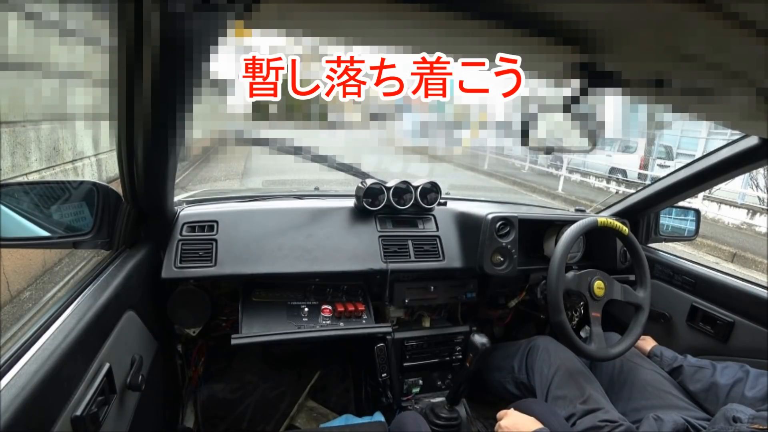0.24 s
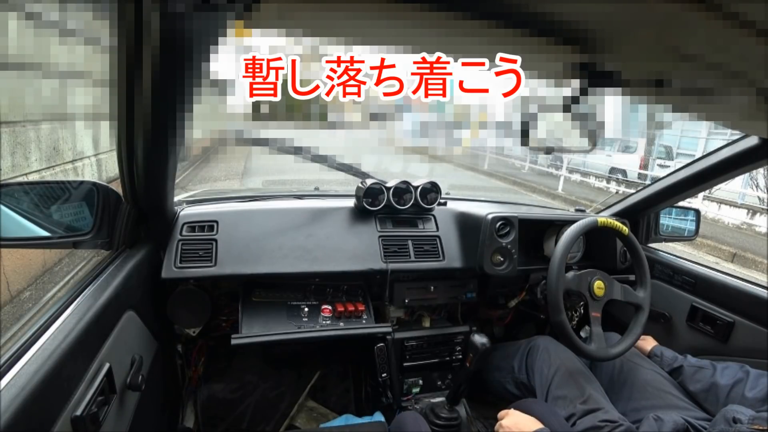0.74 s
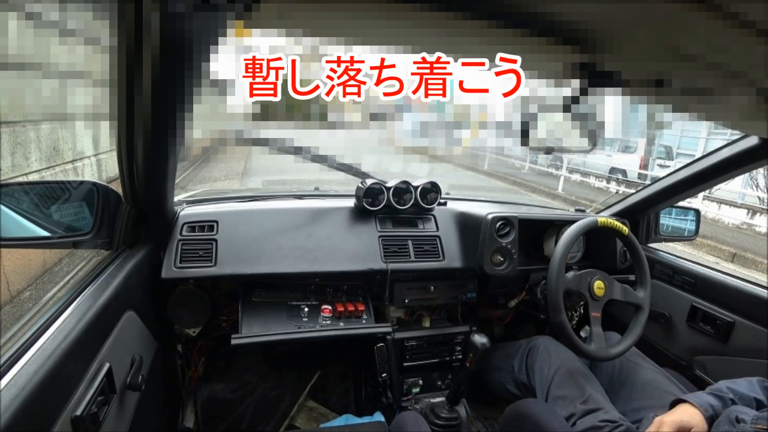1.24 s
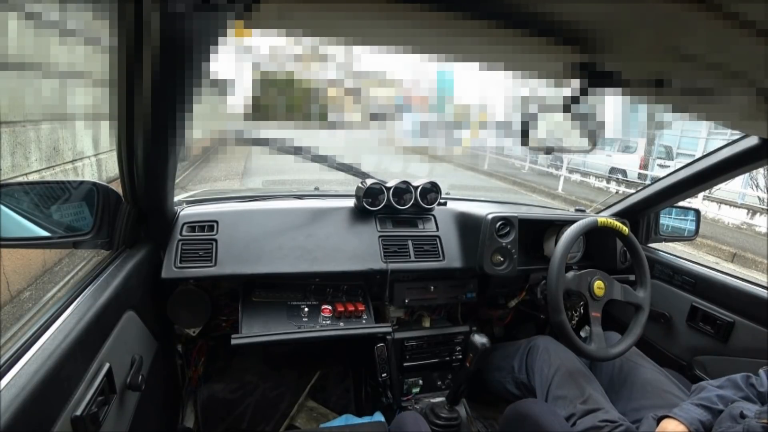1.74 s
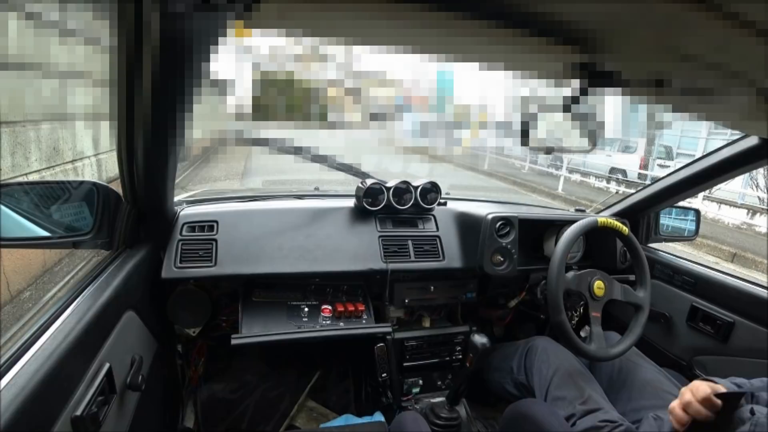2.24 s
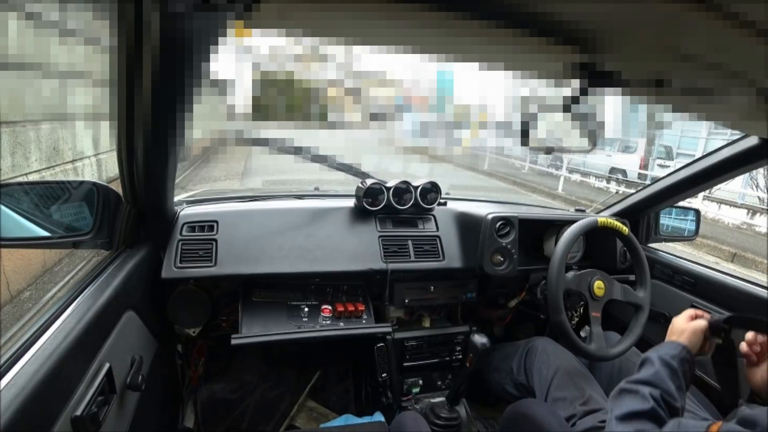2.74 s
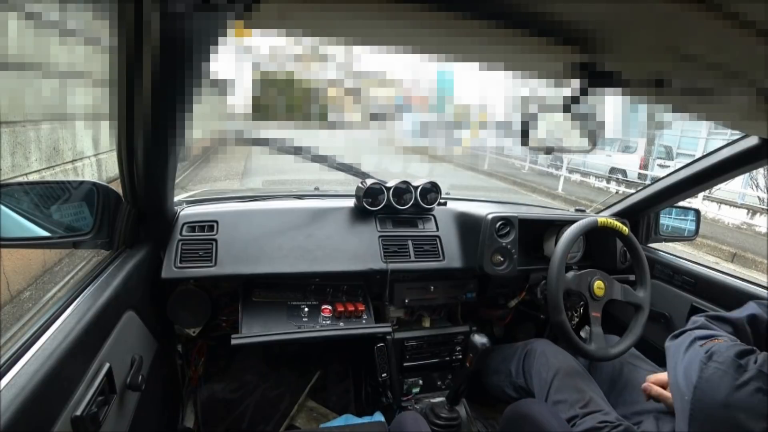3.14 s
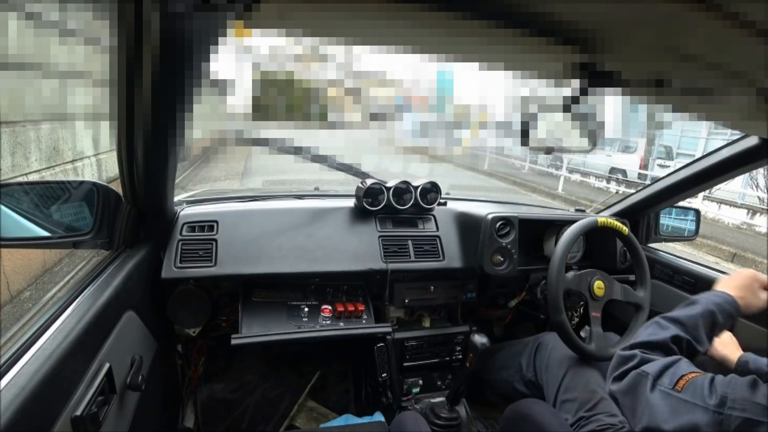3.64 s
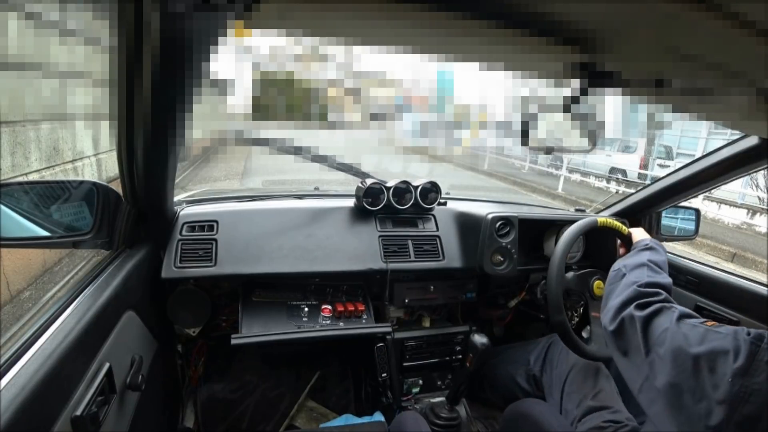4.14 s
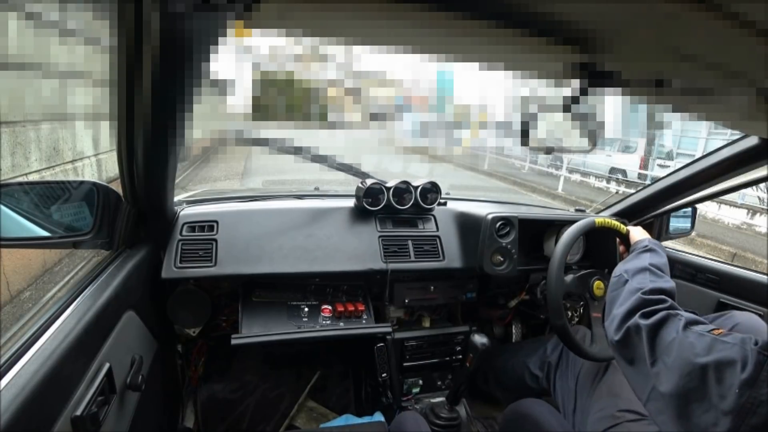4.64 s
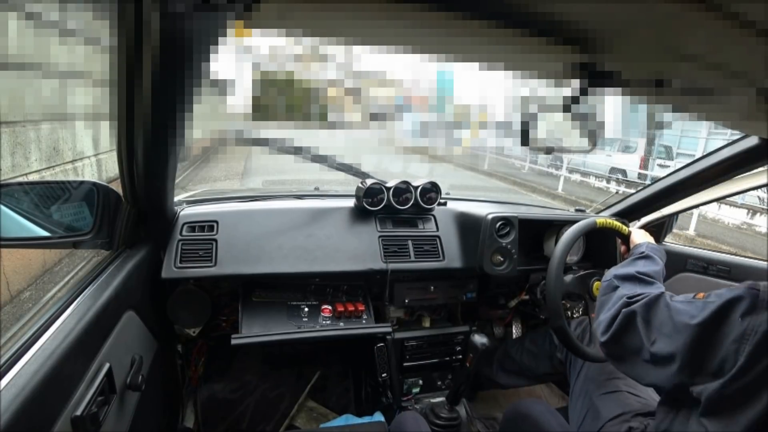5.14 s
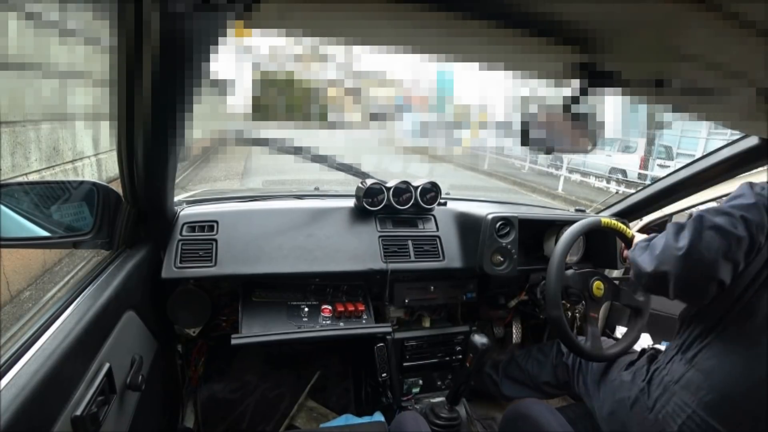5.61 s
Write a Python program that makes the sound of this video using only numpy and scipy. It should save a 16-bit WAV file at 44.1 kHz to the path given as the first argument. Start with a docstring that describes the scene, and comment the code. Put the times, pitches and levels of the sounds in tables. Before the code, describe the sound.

Close cabin sounds of jacket rustle, belt rubbing, buckle snap, seat knocks and door latch clunks, with deep traffic rumble swelling underneath.

```python
"""A driver unbuckles, shifts in the seat and opens the door of a parked car, close to two microphones.
Jacket, webbing and seat are noise roughened by sparse slips; seat and door knocks are rough contacts
ringing damped panel modes; buckle and trim clicks are a ringing pitch over crackle.
Low-passed traffic rumble swells as the body lurches; hiss lies beneath; the level dips briefly at times
as the door unlatches; late on a small metal part sings a thin wavering tone."""
import sys
import numpy as np
from scipy import signal
from scipy.fft import rfft, irfft
from scipy.io import wavfile
from scipy.ndimage import uniform_filter1d

SR = 44100
rng = np.random.default_rng(int(sys.argv[2]) if len(sys.argv) > 2 else 0)


def wav_out(sig):
    """Save sig, one row per channel (or a flat mono array), as 16-bit PCM at SR to the path in sys.argv[1]."""
    wavfile.write(sys.argv[1], SR, np.round(np.clip(np.atleast_2d(sig).T, -1, 1) * 32767).astype(np.int16))


def level_to_linear(level):
    """Convert decibel levels to linear amplitude factors, elementwise."""
    exponent = np.asarray(level, float) / 20
    return 10 ** exponent


N = 258867


def read(points, hz):
    """Spectrum table at hz, straight on a log-frequency axis."""
    f, value = np.transpose(points)
    return np.interp(np.log(hz + 1), np.log(f + 1), value)


def curve(rows):
    """Every column of a time table, interpolated at each sample."""
    s, *columns = np.transpose(rows)
    return [np.interp(np.arange(N) / SR, s, c) for c in columns]


def swells(rows):
    """Power of each swell at each sample: straight rise and fall in dB around its peak."""
    s, db, rise_s, fall_s = np.transpose(rows)[:4, :, None]
    at = np.arange(0, N, 32)
    t = at / SR - s
    # rise and fall times below 1 ms, negative ones too, count as 1 ms
    drop_db = 10 * np.maximum(-t / np.maximum(rise_s, .001), t / np.maximum(fall_s, .001))
    power = level_to_linear(2 * (db - drop_db))
    return np.array([np.interp(np.arange(N), at, p) for p in power])


def evened(x):
    """Scales to rms 1."""
    return x / np.sqrt(np.mean(x ** 2) + 1e-20)


def add(mix, s, sound):
    """Mixes a stereo sound in at s seconds."""
    part = mix[:, round(s * SR):][:, :sound.shape[1]]
    part += sound[:, :part.shape[1]]


def hump(hz, centre_hz, octaves):
    """Broad emphasis around one pitch."""
    return 1 / (1 + (np.log2((hz + 1) / centre_hz) / octaves) ** 2) ** 2


def grainy(per_s, spread_db, tail_s, smooth):
    """Noise pair whose loudness is kicked up by sparse slips that die away."""
    kicks = level_to_linear(spread_db * np.minimum(rng.exponential(1, N), 4))
    slips = kicks * (rng.random(N) < per_s / SR)
    decay = np.exp(-1 / (tail_s * SR))
    lumps = smooth + evened(signal.lfilter([1], [1, -decay], slips))
    return lumps * rng.standard_normal((2, N))


def recoloured(x, size, patchy_db, gain):
    """Multiplies short-time spectra by gain(hz, s) at even power and by drifting random patches; rms 1."""
    hz, s, z = signal.stft(x, SR, nperseg=size)
    patches = uniform_filter1d(rng.standard_normal(z.shape[1:]), 8, 0)
    patches = evened(uniform_filter1d(patches, 8, 1))
    g = gain(hz[:, None], s)
    power = (abs(z) ** 2).mean((0, 2))[:, None]
    g = g / np.sqrt((g ** 2 * power).sum(0) / power.sum())
    return evened(signal.istft(z * g * level_to_linear(patchy_db * patches), SR, nperseg=size)[1][:, :N])


# left-right likeness of distant sound: (frequency [Hz], likeness [-1 to 1])
LIKENESS = [(30, 1), (60, 0.96), (170, 0.99), (480, 0.84), (1360, 0.61), (3870, -0.058), (11000, -0.46)]
LEFT_LAG_S = 7e-5


def pair(a, b, gain, near=0.):
    """Two microphones: alike in the bass, less so in the treble unless near; gain(hz) colours both."""
    hz = np.fft.rfftfreq(len(a), 1 / SR)
    same = np.clip(read(LIKENESS, hz) * (1 - near) + near, -1, 1)
    right = rfft(a)
    left = same * right + np.sqrt(1 - same ** 2) * rfft(b)
    left = left * np.exp(-2j * np.pi * hz * LEFT_LAG_S)
    return irfft(np.array([left, right]) * gain(hz), len(a))


# traffic boom: (time [s], level [dB])
RUMBLE_LEVEL = [(0.0, -51), (0.15, -34), (0.8, -32), (1.27, -35), (2.0, -34), (2.52, -38.5), (2.9, -29),
                (3.4, -40.5), (3.66, -41), (3.9, -35), (4.12, -33), (4.5, -22.5), (4.71, -30.5),
                (5.0, -25.5), (5.25, -25.5), (5.55, -21), (5.87, -21.5)]
# relative rumble spectrum: (frequency [Hz], gain [dB])
RUMBLE_COLOUR = [(8.8, -47), (15, 3), (32, -3.5), (62, -5), (145, -18.5), (253, -25.5), (294, -27),
                 (571, -35), (770, -37), (839, -38), (2500, -49), (3250, -78), (5500, -120)]
# body lurching on its springs as weight shifts:
# (peak time [s], level [dB], time to rise 10 dB [s], time to fall 10 dB [s])
LURCHES = [(.46, -30, -0.04, 0.6), (.88, -27, -0.03, 0.2), (1.4, -23.5, 0.02, 0), (1.54, -21, 0.1, 0.03),
           (2.45, -29.5, 1.5, .06), (2.7, -29, .15, 0), (3.12, -24.5, .3, 0), (3.53, -24.5, 0.3, .06),
           (3.74, -18, 0, 0.05), (4.07, -18.5, 0.22, -0.07), (4.22, -18.5, 0.13, 0.1),
           (4.35, -18, -0.08, .12), (4.64, -20.5, 0.1, .06), (4.77, -28, -0.2, -0.5),
           (4.9, -19, -0.05, 0.1), (5.15, -22.5, 0.23, 0.3), (5.43, -27, -0.18, 0)]


def rumble():
    """Traffic through the body: low-passed noise swelling with each lurch, over a steady upper part."""
    noise = pair(*rng.standard_normal((2, N)), lambda hz: level_to_linear(read(RUMBLE_COLOUR, hz)))
    boom = signal.sosfilt(signal.butter(2, 130, fs=SR, output="sos"), noise)
    level_db, = curve(RUMBLE_LEVEL)
    boom_power = level_to_linear(2 * level_db) + swells(LURCHES).sum(0)
    upper = level_to_linear(-32) * (noise - boom) / np.std(boom)
    return evened(boom) * np.sqrt(boom_power) + upper


def hiss():
    """Microphone hiss: white noise, independent per channel."""
    return level_to_linear(-52.5) * rng.standard_normal((2, N))


# relative cloth spectrum: (frequency [Hz], gain [dB])
CLOTH_COLOUR = [(1180, -46), (2000, -5.5), (2780, -2.5), (4450, -3.5), (4770, -5.5), (6970, -4.5),
                (9950, -6), (11000, -8.5), (14300, -46), (22000, -120)]
# jacket strokes: (peak time [s], level [dB], time to rise 10 dB [s], time to fall 10 dB [s],
# brightness [dB per octave])
STROKES = [(.97, -38, -0.6, -0.5, 7), (1.075, -32.5, 0.16, .055, 3.5), (1.2, -34, -1.07, -0.6, -8),
           (1.264, -39.5, -0.64, 0.43, 4), (1.37, -38, 0.05, -0.2, 1), (1.518, -29, 0, 0.03, 6),
           (1.63, -46.5, 0.2, .12, 8.5), (1.958, -33.5, 0, 0.08, 0), (2.196, -34, 0.08, .13, 3),
           (2.47, -44, -0.26, 0.2, 7), (2.743, -29.5, 0.01, 0.06, 1.5), (2.96, -44, -0.3, 0.27, -2),
           (3.09, -43.5, -1.56, -0.3, 3.5), (3.17, -38, 0.07, 0.14, -3), (3.974, -36.5, 0.04, 0.04, -4),
           (4.394, -34.5, 0.03, -0.17, 0.5), (4.522, -43, 0.3, 0.2, -0.5), (4.93, -41.5, -0.43, 0.36, 6),
           (5.07, -40, 0.16, -0.03, -6), (5.25, -47.5, 0.1, .2, -15), (5.445, -41, -0.6, .12, 7),
           (5.74, -37, -0.04, -0.5, 5), (5.815, -36, 0.01, -0.5, 6.5)]
RUSTLE_DB_PER_OCTAVE = 3.5


def cloth(rustle_db):
    """Jacket: dense slips in fabric; background rustle and strokes add in power, the louder sets the tilt."""
    t, strokes = np.arange(N) / SR, swells(STROKES)
    rustle = level_to_linear(2 * rustle_db)
    power = rustle + strokes.sum(0)
    tilt = (rustle * RUSTLE_DB_PER_OCTAVE + np.array(STROKES)[:, -1] @ strokes) / power
    sound = pair(*grainy(250, 1.6, 0.016, 3.1), lambda hz: level_to_linear(read(CLOTH_COLOUR, hz)), 0.26)
    sound = recoloured(sound, size=512, patchy_db=1.5,
                       gain=lambda hz, s: level_to_linear(np.interp(s, t, tilt) * np.log2((hz + 500) / 5000)))
    return np.sqrt(power) * sound


# relative webbing spectrum: (frequency [Hz], gain [dB])
RUB_COLOUR = [(500, -4.5), (800, -7.5), (1300, -5), (1900, -9), (2500, -9), (3500, -17)]
# strongest pitch of the rub: (time [s], centre [Hz])
RUB_CENTRE = [(.85, 1390), (1.6, 1300), (2.05, 2120), (2.3, 1900), (2.6, 1420), (3.2, 1190), (3.6, 1200),
              (4.4, 1190), (4.9, 1300), (5.87, 1190)]


def webbing(rub_db):
    """Belt webbing: sparse friction slips under a broad, drifting emphasis."""
    sound = pair(*grainy(150, 3.5, .006, 2.0), lambda hz: level_to_linear(read(RUB_COLOUR, hz)), 0.53)
    sound = recoloured(sound, size=1024, patchy_db=3.0,
                       gain=lambda hz, s: hump(hz, np.interp(s, *np.transpose(RUB_CENTRE)), 2.2))
    return level_to_linear(rub_db) * sound


# seat frame and door panel modes: (frequency [Hz], level [dB])
PANEL_MODES = [(98, 9), (156, 1.5), (205, -1), (240, -1), (291, -1), (350, -3.5), (420, 2), (490, -7),
               (560, -3), (610, -3), (705, 0.5), (860, 0)]


def panel(hz):
    """Response of the well damped panel, dull above its top mode; higher modes die sooner."""
    f, db = np.transpose(PANEL_MODES)[:, :, None]
    t60_s = .065 * (200 / f) ** .4
    modes = (level_to_linear(db) / (1 + 1j * (hz - f) * t60_s * 2 / 2.34)).sum(0)
    return modes * (hz / (hz + 60)) ** 2 / (1 + 1j * hz / 1100) ** 2


def seat(seat_db):
    """Loaded seat: slow slips mutter through the panel modes, centred higher as the load rises."""
    t = np.arange(N) / SR
    mutter_hz = np.maximum(174 + 1 * (seat_db + 33), 100)  # 174 Hz at -33 dB, 1 Hz per dB
    sound = recoloured(pair(*grainy(60, 2.5, .012, 1.5), panel, 0.075), size=2048, patchy_db=1.5,
                       gain=lambda hz, s: hump(hz, np.interp(s, t, mutter_hz), 1.216))
    return level_to_linear(seat_db) * sound


# driver's movement: (time [s], cloth rustle [dB], webbing rub [dB], seat load [dB])
MOTION = [(.8, -44, -45, -38), (.9, -49, -47.5, -35.5), (1.0, -56, -41, -39.5), (1.2, -53, -46.5, -40),
          (1.42, -44, -40.5, -35), (1.76, -51.5, -50, -39.5), (2.05, -41, -42.5, -41.5),
          (2.15, -45, -36.5, -35), (2.4, -43.5, -44.5, -45.5), (2.65, -38.5, -40.5, -35),
          (2.8, -40, -43.5, -30.5), (3.0, -42.5, -42.5, -35.5), (3.17, -42.5, -39, -26),
          (3.26, -44, -43, -27), (3.41, -44, -48.5, -35), (3.47, -44, -43.5, -28.5),
          (3.56, -47.5, -45, -39.5), (3.92, -51, -53.5, -38.5), (3.975, -61.5, -32, -23.5),
          (4.01, -70, -45.5, -28), (4.3, -56.5, -49, -35), (4.39, -66, -47.5, -24),
          (4.69, -46.5, -46.5, -37), (4.82, -42.5, -39, -30), (5.07, -46, -38, -28), (5.33, -45, -44, -30),
          (5.43, -40.5, -38.5, -31.5), (5.68, -53, -49, -37), (5.82, -40.5, -40, -34),
          (5.87, -51, -41, -25.5)]


def driver(dip_db):
    """Body movement loads cloth, webbing and seat together; the cloth takes the dips in full."""
    rustle_db, rub_db, seat_db = curve(MOTION)
    moving = np.clip((np.arange(N) / SR - .84) / 0.055, 0, 1)
    friction = webbing(rub_db) + seat(seat_db)
    return moving * (level_to_linear(dip_db) * cloth(rustle_db) + level_to_linear(0.59 * dip_db) * friction)


# blows on seat and door panel: (time [s], level [dB], thump pitch [Hz],
# upper modes re thump [dB], upper centre [Hz])
KNOCKS = [(0.867, -21.5, 160, -31, 420), (0.888, -19.5, 88, -33, 420), (1.388, -17.5, 94.5, -32, 420),
          (1.514, -21, 251, -27, 420), (1.629, -24.5, 147, -9.5, 390), (2.04, -24.5, 152, -8.5, 380),
          (2.233, -24, 159, -13, 458), (2.37, -25.5, 236, -2, 455), (2.488, -24, 168, -14, 415),
          (2.653, -15.5, 161, 3, 440), (2.679, -16, 157, -17, 420), (2.912, -18, 274, -41, 420),
          (2.975, -20.5, 170, -12, 417), (3.082, -18.5, 160, -5, 435), (3.1, -22, 170, -1, 447),
          (3.119, -20, 189, 2, 454), (3.136, -18, 200, 5, 474), (3.149, -14, 90.5, -7, 398),
          (3.173, -11.5, 221, 3, 666), (3.2, -19, 200, 2, 610), (3.428, -10.5, 148, -2, 517),
          (3.449, -15, 284, -18, 414), (3.497, -17, 122, -21, 490), (3.717, -21, 162, -16, 666),
          (3.745, -20.5, 129, -23, 420), (3.809, -23.5, 190, -3, 393), (3.973, -14, 217, 2.5, 500),
          (3.998, -15.5, 186, -6.5, 464), (4.182, -29, 100, -14, 382), (4.214, -22, 91.5, -6, 436),
          (4.253, -16, 196, -8, 447), (4.412, -19.5, 104, -15, 393), (4.52, -8.5, 190, -30, 385),
          (4.611, -19, 217, -37, 420), (4.672, -22, 237, -28.5, 380), (4.859, -29, 175, -31, 425),
          (5.029, -14.5, 122, -16, 384), (5.1, -16.5, 110, -12.5, 396), (5.16, -21, 198, -15, 397),
          (5.283, -16, 105, -11, 414), (5.57, -12, 104, -29, 378), (5.798, -15.5, 155, -39, 420),
          (5.841, -13.5, 91.5, -36, 420)]
CONTACT_S = 0.0076  # contact onset to its peak


def knocks():
    """Each blow is a short, soft, rough contact: a low thump, and the upper modes if it is hard."""
    out, t = np.zeros((2, N)), np.arange(8192) / SR
    for s, db, thump_hz, upper_db, upper_hz in KNOCKS:
        u = t / CONTACT_S
        blow = u * np.exp(-u) * rng.standard_normal((2, len(t)))
        thump = pair(*blow, lambda hz: panel(hz) * hump(hz, thump_hz, 0.65), 0.23)
        upper = pair(*blow, lambda hz: panel(hz) * hump(hz, upper_hz, 0.71), 0.43)
        ring = evened(thump) + level_to_linear(upper_db) * evened(upper)
        # level: twice the loudest 600-sample rms, right channel
        peak = np.sqrt(4 * uniform_filter1d(ring[1] ** 2, 600).max())
        add(out, s - .003, level_to_linear(db) * ring / peak)
    return out


# buckle, latch and trim: (time [s], level [dB], ring [Hz], wide crackle re ring [dB], t60 [s])
CLICKS = [(0.8699, -36.5, 1090, 1, 0.026), (1.1788, -27.5, 1100, 5.5, 0.025), (1.255, -38, 1050, 6, 0.023),
          (1.3798, -20, 1100, 12, 0.031), (1.522, -22, 9270, 2, 0.055), (1.774, -30, 6300, 10, 0.022),
          (1.9284, -16, 1120, 6, 0.025), (1.945, -13, 9700, 1, 0.02), (1.9532, -13, 3250, 5, 0.022),
          (1.9612, -12.5, 7640, -2, 0.021), (2.1953, -23, 1090, 4, 0.025), (2.4762, -28.5, 9800, 2, 0.034),
          (2.6718, -23.5, 1680, 18, 0.031), (2.8448, -19.5, 1300, -2, 0.032),
          (3.1434, -25, 1340, -4, 0.039), (3.1647, -20, 1370, -7, 0.035), (3.175, -19, 810, -5, 0.022),
          (3.414, -27, 3250, -8, 0.018), (3.461, -31, 3200, -6, .022), (3.509, -32, 3220, -10, .022),
          (3.7185, -30, 1210, -3, 0.022), (3.7967, -30, 4160, 6.5, 0.02), (3.8113, -13, 2660, 6, .02),
          (3.9688, -16, 1070, -3, 0.047), (4.18, -37, 1180, -12, 0.032), (4.2153, -28, 1230, -1, .02),
          (4.2522, -26, 1000, -2, 0.051), (4.4017, -17.5, 1200, 3.5, 0.039),
          (5.0361, -25.5, 1180, -9, 0.042), (5.0614, -16.5, 1260, -6, 0.019), (5.22, -34, 1310, 9, .03),
          (5.247, -28, 1280, 2, 0.025), (5.2913, -13.5, 1300, -13, 0.017), (5.691, -38, 6200, -6, .014),
          (5.715, -33.5, 5990, -7, 0.013), (5.755, -35, 6200, -4, .014), (5.849, -32, 6000, -4, .014),
          (5.8138, -21, 1780, 14.5, 0.02), (5.827, -30, 1000, 2, .03)]
CLICK_RISE_S, RISE_POWER = 0.0032, 1.2  # rise at t60 30 ms; longer clicks rise slower
SNAP_DB, SNAP_DB_PER_OCTAVE = -5.5, -6  # snap re burst at t60 39 ms; shorter clicks snap harder


def clicks():
    """A dry snap and a burst of tiny impacts: a ringing pitch over wide crackle, then a short cabin tail."""
    out, t = np.zeros((2, N)), np.arange(4096) / SR
    for s, db, ring_hz, wide_db, t60_s in CLICKS:
        rise_s = CLICK_RISE_S * (t60_s / .03) ** RISE_POWER
        rise = 1 - np.exp(-(t / rise_s) ** 2)
        cabin_tail = level_to_linear(-17 - 60 * t / .11)
        decay = level_to_linear(-60 * t / max(t60_s, .005)) + cabin_tail
        burst = rise * decay * rng.standard_normal((2, len(t)))
        snap_db = SNAP_DB + SNAP_DB_PER_OCTAVE * np.log2(t60_s / 0.039)
        snapped = burst.copy()
        snapped[0, 60] += level_to_linear(snap_db) * np.linalg.norm(burst[0])
        width_hz = 600 + 0.078 * ring_hz
        ring = pair(*snapped, lambda hz: 1 / (1 + 2j * (hz - ring_hz) / width_hz) ** 2, 0.13)
        wide = pair(*burst, lambda hz: level_to_linear(read(CLOTH_COLOUR, hz)) + level_to_linear(read(RUB_COLOUR, hz)), 0.45)
        sound = evened(ring) + level_to_linear(wide_db) * evened(wide)
        # level: twice the loudest 90-sample rms, both channels
        peak = np.sqrt(4 * uniform_filter1d((sound ** 2).mean(0), 90).max())
        add(out, s - .001, level_to_linear(db) * sound / peak)
    return out


# level dips as the door unlatches: (start [s], end [s], depth [dB], fall time [s], return time [s])
DIPS = [(4.046, 4.06, -20, .005, 0.0059), (4.06, 4.2, -20, 0.048, 0.052), (4.224, 4.245, -25, 0.0041, .022),
        (4.276, 4.302, -16, 0.0036, 0.018)]


def dropouts():
    """Gain in dB at each sample: each dip falls towards its depth, holds if time allows, and returns."""
    t, dip_db = np.arange(N) / SR, np.zeros(N)
    for start, end, depth_db, fall_s, return_s in DIPS:
        dip_db += depth_db * np.clip(np.minimum((t - start) / fall_s, (end - t) / return_s), 0, 1)
    return dip_db


# small metal part: (peak time [s], level [dB], time to rise 10 dB [s], time to fall 10 dB [s])
SING_SWELLS = [(4.906, -42, .004, 0.043), (4.926, -28.5, 0.0042, 0.0065), (4.95, -50, .02, .05)]
SING_HZ = 8104


def sing():
    """A small metal part sings: a thin tone, phase wavering at 260 Hz, nearer the left microphone."""
    t = np.arange(N) / SR
    tone = np.sin(2 * np.pi * SING_HZ * t + 0.35 * np.sin(2 * np.pi * 260 * t))
    return np.sqrt(2 * swells(SING_SWELLS).sum(0)) * tone * level_to_linear(np.array([[3.0], [-3.0]]))


def scene():
    """Cabin mix: dips spare the bass and the singing tone, and act in part on knocks and clicks."""
    dip_db = dropouts()
    low = rumble()
    bass = signal.sosfiltfilt(signal.butter(2, 100, fs=SR, output="sos"), low)
    background = bass + level_to_linear(dip_db) * (low - bass + hiss())
    impacts = level_to_linear(0.54 * dip_db) * (knocks() + clicks())
    return background + driver(dip_db) + impacts + sing()


def roll_off(x):
    """The treble ends steeply here."""
    return signal.sosfilt(signal.butter(12, 11550, fs=SR, output="sos"), x)


LEFT_OVER_RIGHT_DB, EDGE_HZ = 1.0, 11024


def record(dry):
    """Left channel slightly hotter, then a steep band limit."""
    x = dry * level_to_linear(np.array([[LEFT_OVER_RIGHT_DB / 2], [-LEFT_OVER_RIGHT_DB / 2]]))
    lowpass = signal.firwin(511, EDGE_HZ, window=("kaiser", 9), fs=SR)
    x = signal.oaconvolve(x, lowpass[None], "same")
    return roll_off(x)


dry = scene()
out = record(dry)
wav_out(out)
```